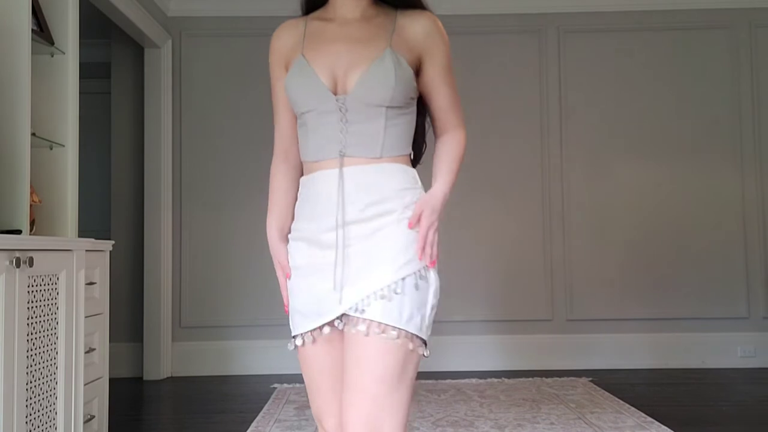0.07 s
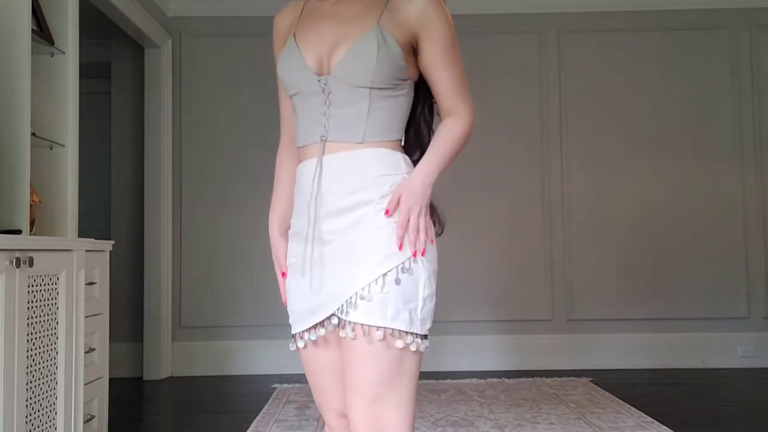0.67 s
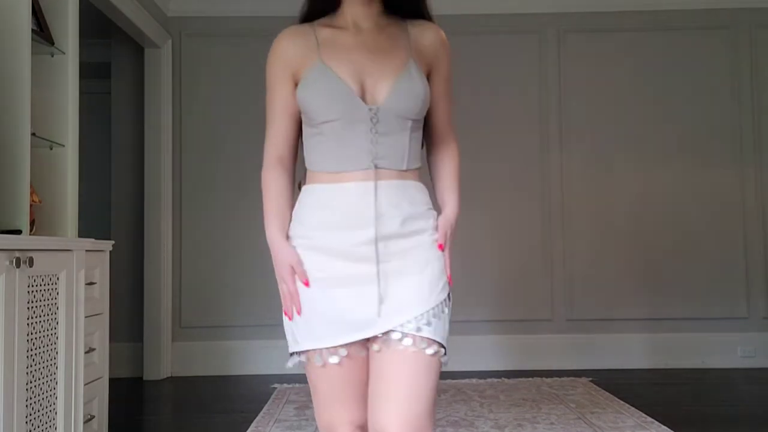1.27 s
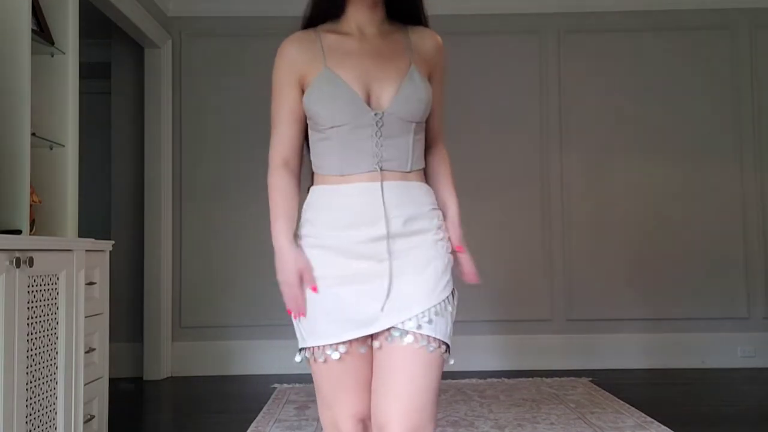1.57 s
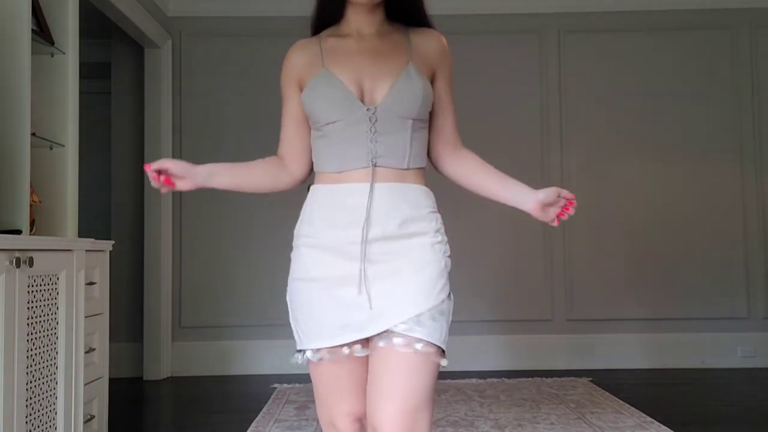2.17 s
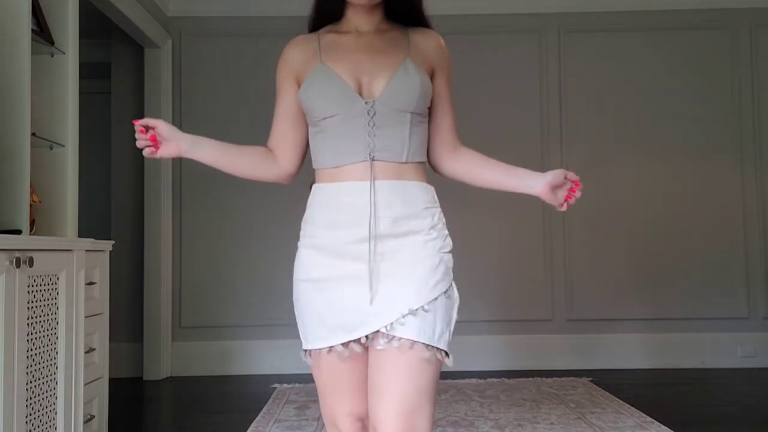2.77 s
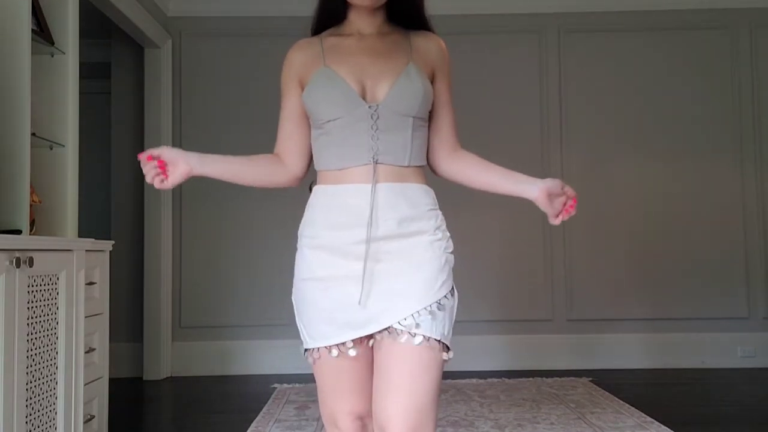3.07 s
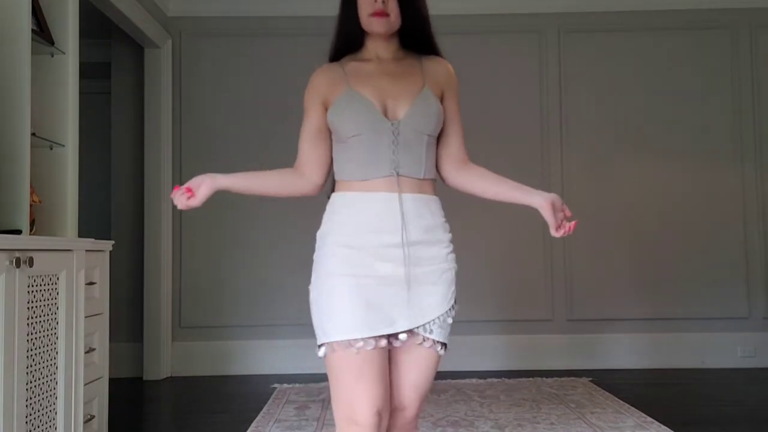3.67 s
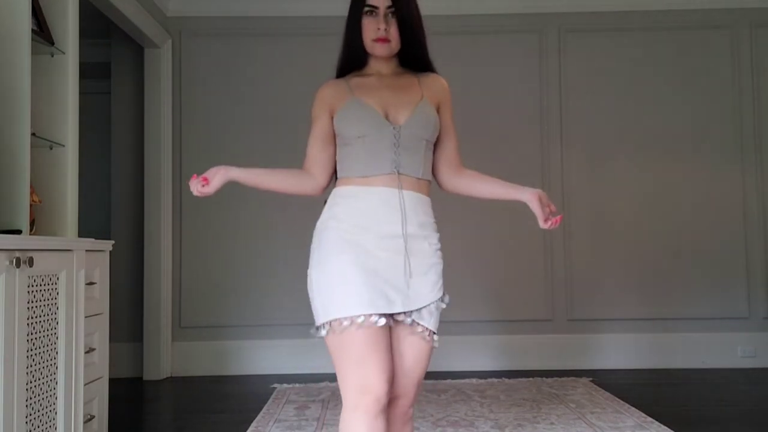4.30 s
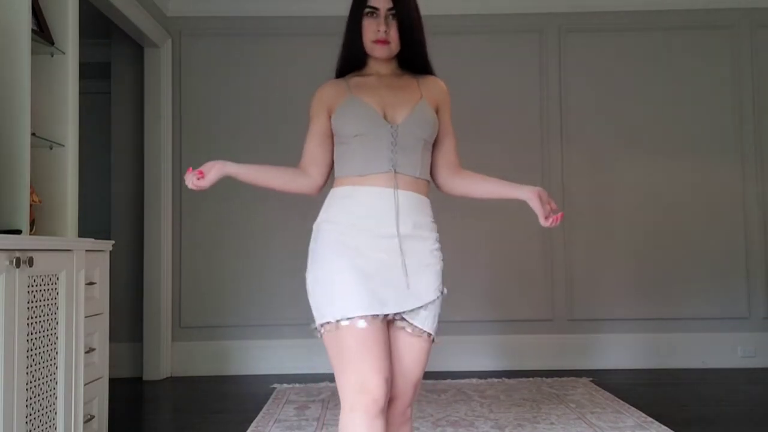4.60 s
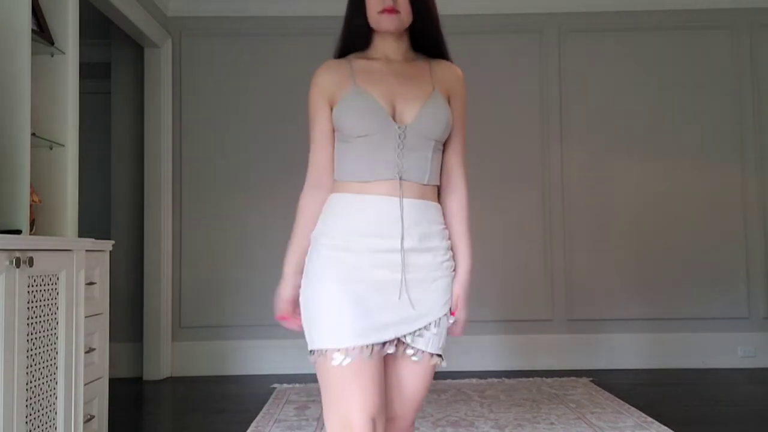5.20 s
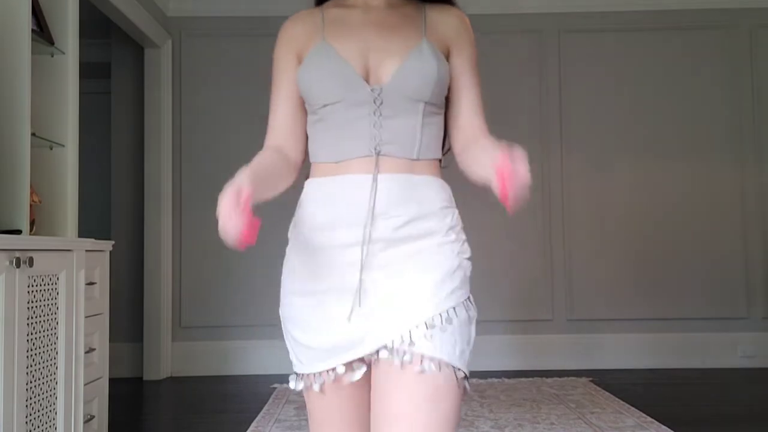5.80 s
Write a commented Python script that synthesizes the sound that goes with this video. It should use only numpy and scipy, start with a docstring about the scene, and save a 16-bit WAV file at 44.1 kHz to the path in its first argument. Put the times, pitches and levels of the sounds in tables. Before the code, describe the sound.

Light metallic ticks from a skirt's dangling trim build into quick, shimmering flurries, with a few soft footsteps and a low room hum.

```python
"""Light ticks, then bright clashing showers: a skirt hemmed with small dangling discs, two metres from
a phone microphone in a quiet panelled room. The discs graze and ring as the wearer turns, then collide
in flurries as each shake of the hips throws the hem against the legs. A palm brushes the cloth at the
start, and later a few soft steps fall on the rug. The walls return each clink, and a low hum with a
swelling rumble lies underneath."""
import sys
import numpy as np
from scipy import signal
from scipy.fft import rfft, irfft
from scipy.io import wavfile
from scipy.ndimage import uniform_filter1d

SR = 44100
rng = np.random.default_rng(int(sys.argv[2]) if len(sys.argv) > 2 else 0)


def bounce(signal):
    """Save signal as a 16-bit WAV file at the path given by the first command-line argument."""
    frames = np.transpose(np.atleast_2d(signal))
    limited = np.clip(frames, -1, 1)
    pcm = np.round(limited * 32767).astype(np.int16)
    wavfile.write(sys.argv[1], SR, pcm)


N = 266805


def undb(db):
    """Decibels to gain."""
    return 10 ** (np.asarray(db) / 20)


def unit(x):
    """Scale to rms 1."""
    return x / np.sqrt(np.mean(x ** 2))


def curve(rows):
    """Join (seconds, value) rows by straight lines, one value a sample."""
    times, values = np.transpose(rows)
    return np.interp(np.arange(N) / SR, times, values)


def colour(x, points, size=8192):
    """Minimum-phase filter with the given (Hz, dB) response."""
    hz, db = np.transpose(points)
    bins_hz = np.fft.rfftfreq(size, 1 / SR)
    gain = undb(np.interp(np.log(bins_hz + 1), np.log(hz), db))
    cepstrum = irfft(np.log(gain))
    cepstrum[1:size // 2] *= 2
    cepstrum[size // 2 + 1:] = 0
    response = irfft(np.exp(rfft(cepstrum)))
    return signal.fftconvolve(x, response[None], axes=1)[:, :x.shape[1]]


def fade(t, t60):
    """Exponential decay, 60 dB down after t60 seconds."""
    return np.exp(-np.log(1000) * t / t60)


def add(out, start_s, x):
    """Mix a short sound in at start_s."""
    i = max(int(start_s * SR), 0)
    out[:, i:i + x.shape[1]] += x[:, :N - i]


def stereo_noise(side_db):
    """Noise that is alike left and right in the bass and nearly unrelated in the treble."""
    mid, side = rng.standard_normal((2, N))
    side = colour(side[None], [(350, side_db), (650, -1), (2000, -1.8)])
    return mid + side * np.array([[1], [-1]])


def room_tone(air_db=-68, rumble_gain_db=0.28):
    """The room by itself: steady air noise, a narrow hum, and a low rumble that swells and sinks."""
    # Each row: frequency in Hz, relative level in dB.
    air_colour = [(20, -23.5), (38, -11), (59, -6.5), (92, -19), (146, -9.5), (190, -13.5), (270, -4.5),
                  (345, -18), (450, -23.5), (620, -26), (1500, -33), (3000, -37.5), (16000, -29)]
    rumble_colour = [(120, -23), (220, -3.5), (290, 2), (355, 3.5), (430, -9.5), (550, -19), (800, -33),
                     (1500, -31.5), (3000, -36)]
    # Resonances of the hum. Each row: centre in Hz, width in Hz, rms level in dB.
    resonances = [(55.5, 38, -72), (137.4, 14, -76.5)]
    # Course of the rumble. Each row: time in seconds, level in dB before rumble_gain_db.
    swells = [(0.0, -65.5), (0.1, -59), (0.18, -66.5), (0.88, -78.5), (1.06, -61.5), (1.53, -67),
              (1.57, -63.5), (1.84, -75.5), (2.58, -65.5), (2.86, -78), (3.13, -58), (3.33, -68),
              (3.44, -59.5), (3.52, -77), (3.55, -65), (4.94, -73.5), (5.07, -62), (5.21, -73), (5.31, -62),
              (5.83, -71), (5.98, -57.5), (6.05, -63)]
    air = undb(air_db) * unit(colour(stereo_noise(side_db=-10.5), air_colour))
    hum = 0
    for hz, width_hz, db in resonances:
        b, a = signal.iirpeak(hz, hz / width_hz, fs=SR)
        band = signal.lfilter(b, a, stereo_noise(side_db=-13))
        hum += undb(db) * unit(signal.lfilter(b, a, band))
    rumble = unit(colour(stereo_noise(side_db=-9), rumble_colour))
    return air + hum + undb(curve(swells) + rumble_gain_db) * rumble


def steps(rise_s=0.02, boom_t60=0.26, thud_t60=0.39, boom_gain_db=7, thud_gain_db=3.5):
    """Feet thud softly on the rug and the floor booms beneath them."""
    # Steps and weight shifts. Each row: start in seconds, boom and thud in dB before their gains.
    footfalls = [(3.10, -92, -59), (3.432, -63.5, -60.5), (4.31, -58, -67), (4.43, -57, -65),
                 (5.293, -51.5, -54.5), (5.385, -60, -84), (5.48, -83, -56), (5.585, -56.5, -82),
                 (6.021, -57, -55)]
    # Each row: frequency in Hz, relative level in dB.
    boom_colour = [(18, 1), (27, -4), (39, 0.5), (65, -4), (110, -28), (300, -37)]
    thud_colour = [(60, -6), (130, -1), (240, -1), (340, -1), (500, -39), (1200, -36)]
    t = np.arange(SR // 2)[None] / SR
    press = 1 - np.exp(-t / rise_s)
    boom_level, thud_level = np.zeros((2, 1, N))
    for start_s, boom_db, thud_db in footfalls:
        add(boom_level, start_s, undb(boom_db + boom_gain_db) * press * fade(t, boom_t60))
        add(thud_level, start_s, undb(thud_db + thud_gain_db) * press * fade(t, thud_t60))
    boom = unit(colour(stereo_noise(side_db=-11), boom_colour))
    thud = unit(colour(stereo_noise(side_db=-21), thud_colour))
    return boom_level * boom + thud_level * thud


def brush():
    """Soft friction noise of a palm sliding over the skirt."""
    # Each row: time in seconds, level in dB.
    stroke = [(0, -77), (.17, -73.5), (.32, -100), (.5, -130)]
    # Each row: frequency in Hz, relative level in dB.
    cloth_colour = [(500, -14), (1100, -12), (1650, 0), (2200, -11), (5000, -21)]
    return undb(curve(stroke)) * unit(colour(rng.standard_normal((2, N)), cloth_colour))


def walls(direct, tail_db=-5, tail_t60=0.36, build_s=0.0058, early_db=-6, count=8):
    """Floor and cabinet send early echoes to the microphone; the panelling adds a short diffuse tail."""
    t = np.arange(SR // 2) / SR
    tail = rng.standard_normal((2, len(t))) * fade(t, tail_t60) * (1 - np.exp(-t / build_s))
    response = tail / np.sqrt(np.sum(tail ** 2) / 2) * undb(tail_db)
    for channel in response:
        lags = (SR * (0.0018 + 0.013 * rng.random(count))).astype(int)
        channel[lags] += rng.choice([-1, 1], count) * undb(early_db) / np.sqrt(count)
    echoes = signal.fftconvolve(direct, response, axes=1)[:, :N]
    return direct + colour(echoes, [(3000, -3.3), (8000, -2.5), (16000, -2.5)])


def any_disc(spread=0.045, scatter_db=3):
    """Modes of one disc: the discs differ a little in size, and each blow favours other modes."""
    # Each row: frequency in Hz, relative level in dB, time to fall 60 dB in seconds.
    modes = [(7580, -29, 0.02), (9610, -26, 0.018), (11495, -23, 0.016), (13140, -22.5, 0.013),
             (15230, -22.5, 0.016)]
    return [(hz * (1 + spread * rng.standard_normal()), db + scatter_db * rng.standard_normal(), t60)
            for hz, db, t60 in modes]


def contact(modes, tick_t60, shared=0.39):
    """One touch of a disc at the two microphone ports: a dry tick, partly alike in both, and a ring."""
    t = np.arange(SR // 50) / SR
    noise = rng.standard_normal((2, len(t))) + shared * rng.standard_normal(len(t))
    tick = noise * fade(t, tick_t60)
    tick /= np.sqrt(np.sum(tick ** 2, axis=1, keepdims=True))
    # a tilted disc reaches each port with its own phase
    ring = sum(undb(db) * fade(t, t60) * np.sin(2 * np.pi * (hz * t + rng.random((2, 1))))
               for hz, db, t60 in modes)
    return tick + ring


def chatter(modes, forces_db, gap_s, tick_t60):
    """A disc bounces against its neighbour several times in quick succession."""
    out = np.zeros((2, SR // 10))
    gaps = gap_s * (0.3 + 1.4 * rng.random(len(forces_db)))
    for start_s, db in zip(np.cumsum(gaps) - gaps[0], forces_db):
        add(out, start_s, undb(db) * contact(modes, tick_t60))
    return out


def clinks(gain_db=-4.5, ring_db=-11, glance_db=-7, gap_s=0.0012, bounce_t60=0.052, count=9):
    """Single clear knocks, rim to rim: a glancing touch, the full blow, then weakening bounces."""
    # Each row: start in seconds, relative level in dB, ring pitch in Hz, dB added to ring_db.
    blows = [(0.099, -35.5, 11570, 2.5), (0.2354, -43.5, 13000, 2), (0.3816, -35, 12300, -4),
             (0.5125, -42, 12700, -15), (0.536, -41.5, 13800, -7), (0.628, -37, 13100, -6),
             (0.6695, -42.5, 13100, -8), (0.7226, -46, 12800, -14), (0.8056, -46, 14100, -3),
             (0.9548, -42, 11940, 0), (1.1224, -51.5, 13100, -2), (1.1685, -45, 13100, 11),
             (1.1834, -47, 12800, 6), (1.225, -46, 15100, -10), (1.273, -44, 15500, -14),
             (1.3582, -44.5, 12900, 1), (1.4116, -46.5, 9650, 5), (1.694, -47.5, 15400, -8),
             (1.736, -39, 14900, -1), (1.7987, -44, 13000, 11), (1.866, -34, 12500, 2),
             (2.1028, -30, 11500, -7), (2.2261, -31, 11540, 1), (2.4676, -23, 12800, -2),
             (2.831, -25.5, 11950, -2), (2.865, -23, 12600, 7), (2.9324, -29.5, 12400, -6),
             (2.9696, -27, 14900, -5), (3.031, -26, 11750, 0), (3.1603, -32, 11600, -3),
             (3.191, -27.5, 15000, 0), (3.252, -29.5, 10500, -10), (3.364, -32, 13500, -5),
             (3.6068, -30, 15400, -7), (3.7464, -35.5, 12800, 3), (3.7928, -25.5, 14400, -5),
             (3.8235, -32, 15300, 3), (3.9689, -42.5, 11900, -2), (3.9975, -36, 14500, 10),
             (4.146, -35, 13200, 12), (4.469, -43, 11700, -4), (4.5733, -22.5, 13400, 1),
             (4.59, -21.5, 12200, -8), (4.753, -22.5, 15000, -22), (5.059, -32, 13460, 13),
             (5.1484, -26.5, 14500, -4), (5.2675, -29, 13400, -6), (5.327, -32, 14700, -4),
             (5.384, -38.5, 11800, 9), (5.4235, -29.5, 11500, -7), (5.465, -30.5, 13000, 1),
             (5.683, -31, 15400, 5), (5.798, -33.5, 14500, 6), (5.897, -29.5, 12070, 0)]
    # Each row: frequency in Hz, relative level in dB.
    knock_colour = [(1500, -43), (4000, -23.5), (5500, -10.5), (7500, -6), (8600, -9), (10500, -4),
                    (12000, -2), (14000, -7.5), (15700, 5)]
    out = np.zeros((2, N))
    bounces_db = 20 * np.log10(fade(gap_s * np.arange(count), bounce_t60))
    forces_db = np.r_[glance_db, bounces_db]
    for start_s, db, hz, extra_ring_db in blows:
        modes = any_disc() + [(hz, ring_db + extra_ring_db, 0.009)]
        knock = colour(chatter(modes, forces_db, gap_s, tick_t60=0.00047), knock_colour)
        knock /= np.sqrt(np.sum(knock ** 2, axis=1, keepdims=True) / (0.01 * SR))
        # left minus right: the discs hang a little right of the microphone, spread along the hem
        pan_db = rng.normal(-2.5, 1.5)
        channel_db = db + gain_db + np.array([[pan_db], [-pan_db]]) / 2
        add(out, start_s - gap_s / 2, knock * undb(channel_db))
    return out


def jangle(range_db=13, count=680):
    """Separate chattering knocks, each from another disc, at uneven moments; rms 1."""
    out = np.zeros((2, N))
    for k, (late, softness, slowness) in enumerate(rng.random((count, 3))):
        gap_s = 0.0006 + 0.0014 * slowness
        knock = chatter(any_disc(), -10 * rng.random(5), gap_s, tick_t60=0.0012)
        add(out, (k + late) / count * N / SR, unit(knock) * undb(-range_db * softness))
    return unit(out)


def shower(touches_per_s, range_db, tick_t60, discs=24):
    """Many discs graze each other at random, each touch with its own force; rms 1."""
    out = 0
    for _ in range(discs):
        chance, softness = rng.random((2, N))
        touches = chance < touches_per_s / discs
        strikes = touches * undb(-range_db * np.sqrt(softness)) / np.sqrt(touches_per_s)
        out += signal.oaconvolve(strikes[None], contact(any_disc(), tick_t60), axes=1)[:, :N]
    return unit(out)


def throw(start_s, hold_s, attack_s, fall_db_per_s):
    """Envelope of one shake: it rises, lasts until hold_s after its start, then dies away."""
    t = np.arange(N) / SR - start_s
    return np.clip(t / attack_s, 0, 1) * undb(-fall_db_per_s * np.maximum(t - hold_s, 0))


def swing(sway_clatter_db=-12, clatter_loss_db_per_db=0.28):
    """Strength of the light ticking and of the hard clatter: the sway and the shakes add in power."""
    # The body's sway keeps the trim stirring. Each row: time in seconds, relative ticking level in dB.
    sway = [(0, -59), (.55, -63.5), (.78, -67.5), (1.12, -70.5), (1.38, -59.5), (1.67, -78), (1.76, -59.5),
            (1.9, -58), (2.2, -42.5), (3.1, -46), (3.33, -49.5), (3.58, -59), (3.75, -50), (4.35, -44.5),
            (5.25, -49.5), (5.48, -45.5), (5.86, -51), (6.05, -49)]
    # The hips throw the hem against the legs. Each row: start in seconds, relative ticking level in dB,
    # hold in seconds, clatter in dB relative to the ticking.
    shakes = [(1.722, -50.5, 0.028, -36), (1.924, -39, 0.047, -21), (2.097, -33, 0.027, -16.5),
              (2.286, -37, 0.025, -15), (2.483, -32.5, 0.024, -14), (2.639, -31.5, 0.042, -17.5),
              (2.809, -38, 0.078, -10.5), (3.011, -42, 0.13, -8.5), (3.178, -39, 0.034, -8.5),
              (3.35, -46, 0.16, -18), (3.631, -45.5, 0.035, -11.5), (3.799, -44, 0.08, -8),
              (3.996, -41, 0.056, -9), (4.198, -32.5, 0.024, -20.5), (4.399, -37.5, 0.062, -11.5),
              (4.574, -36.5, 0.028, -7), (4.765, -39.5, .04, -15), (4.878, -37.5, 0.068, -18),
              (5.128, -43, .03, -9), (5.286, -51, 0.068, -20), (5.509, -37, 0.021, -13),
              (5.622, -41, 0.067, -16), (5.898, -38.5, 0.052, -18.5)]
    sway_db = curve(sway)
    calm_db = sway_db.max() - sway_db
    tick_power = undb(sway_db) ** 2
    clatter_power = tick_power * undb(sway_clatter_db - clatter_loss_db_per_db * calm_db) ** 2
    for start_s, db, hold_s, clatter_db in shakes:
        # the clatter builds more slowly than the bright ticking and outlasts it
        tick_shape = throw(start_s, hold_s, attack_s=0.0062, fall_db_per_s=219)
        clatter_shape = throw(start_s, hold_s, attack_s=0.018, fall_db_per_s=185)
        tick_power += (undb(db) * tick_shape) ** 2
        clatter_power += (undb(db + clatter_db) * clatter_shape) ** 2
    return np.sqrt(tick_power), np.sqrt(clatter_power)


def clumping(ticking, clumps_per_s=50, spread_db=1.0, spread_per_calm_db=0.11):
    """Random gain that bunches the rattle into short flurries, most of all when few discs move."""
    size = int(SR / clumps_per_s)
    held = rng.standard_normal(N // 100)[np.arange(N) // size]
    flicker = uniform_filter1d(held, size // 4)
    calm_db = 20 * np.log10(ticking.max() / ticking)
    return undb((spread_db + spread_per_calm_db * calm_db) * flicker)


def trim(light_db=-0.07, hard_db=-0.1):
    """The discs along the hem: the harder it swings, the louder they tick and clatter."""
    # A light contact and a hard collision. Each row: frequency in Hz, relative level in dB.
    tick_colour = [(1500, -30), (3500, -19), (5500, -11), (7400, -7.5), (8600, -12), (10500, -8),
                   (12000, -3.5), (14000, -3), (15700, -2)]
    clatter_colour = [(500, -31), (900, -17.5), (1400, -9), (1750, -13.5), (2500, -5.5), (3500, 1.5),
                      (4700, 6), (7300, 2.5), (9000, -0.5), (15000, -20)]
    ticking, clatter = swing()
    crowding = 150 + 1500 * (ticking / ticking.max()) ** 0.3
    grazes = jangle() + 0.85 * shower(crowding, range_db=28, tick_t60=0.0012)
    light = unit(colour(grazes, tick_colour))
    # a hard collision also sounds the lower, duller clack of the whole disc
    collisions = shower(crowding, range_db=26, tick_t60=0.0029)
    hard = unit(colour(collisions, clatter_colour))
    return clumping(ticking) * (light * ticking * undb(light_db) + hard * clatter * undb(hard_db))


def scene():
    """The trim two metres off in its room, over the brush of cloth, steps and room tone."""
    return walls(trim() + clinks()) + brush() + steps() + room_tone()


def record(dry, top_hz=15850):
    """The phone cuts the very top."""
    return signal.sosfilt(signal.ellip(12, 0.2, 70, top_hz, fs=SR, output="sos"), dry)


dry = scene()
out = record(dry)
bounce(out)
```